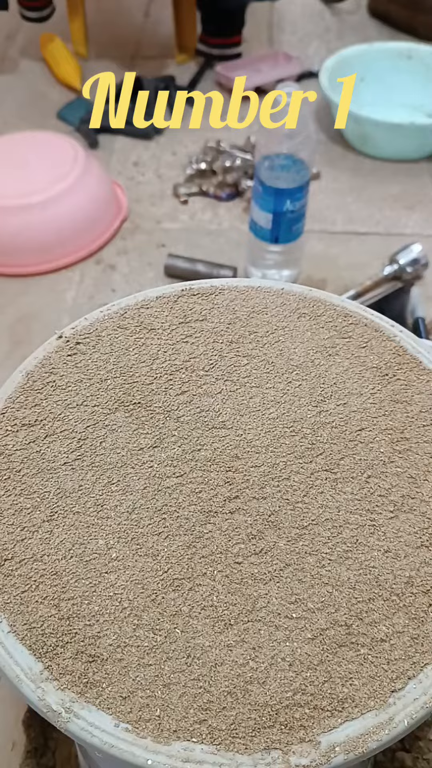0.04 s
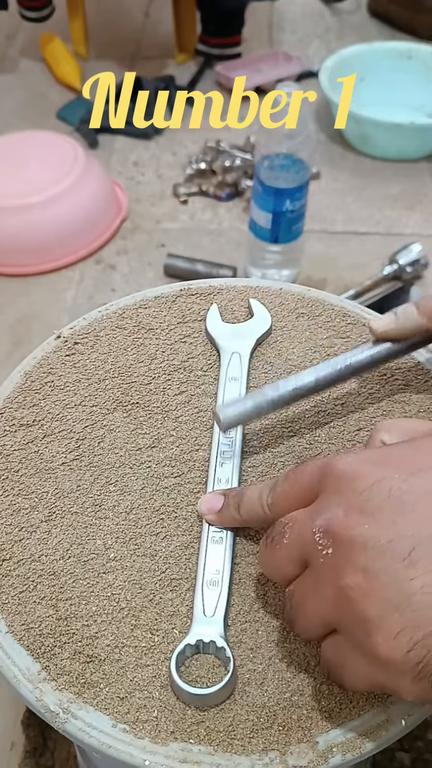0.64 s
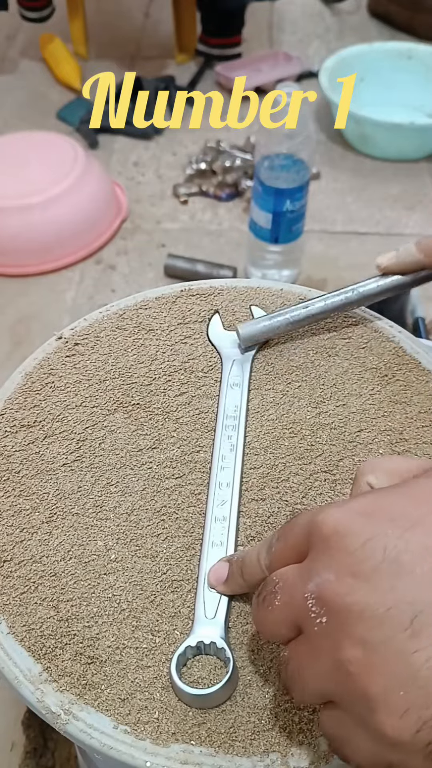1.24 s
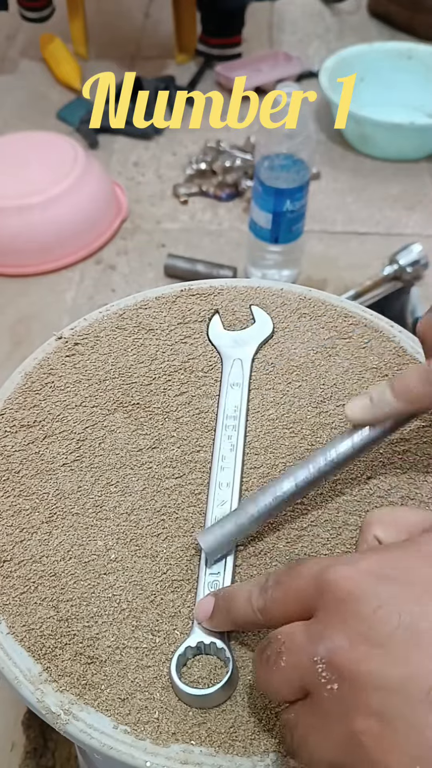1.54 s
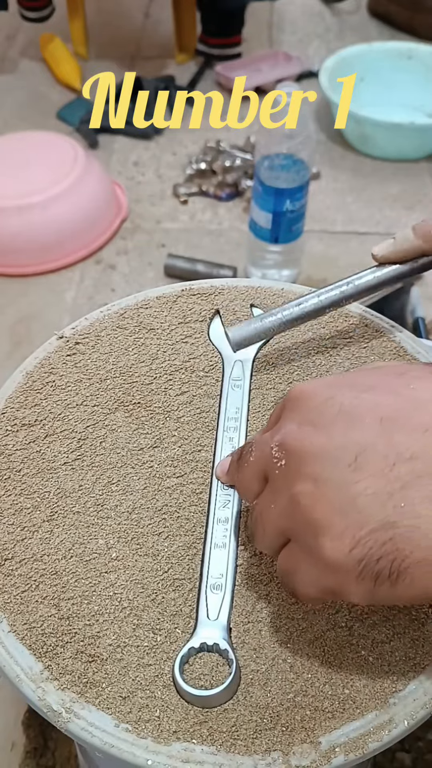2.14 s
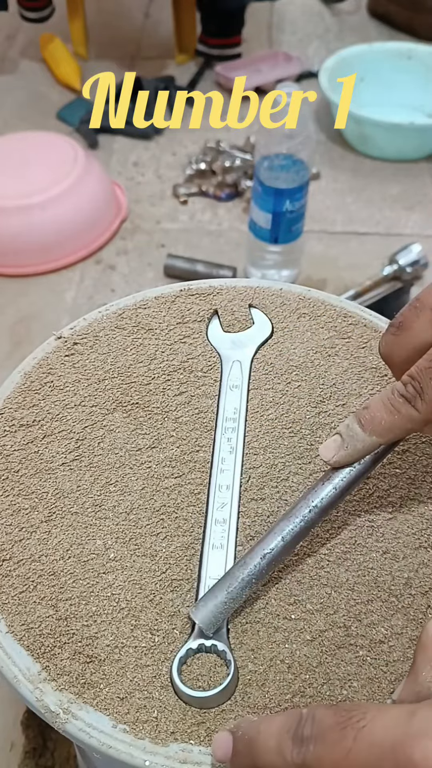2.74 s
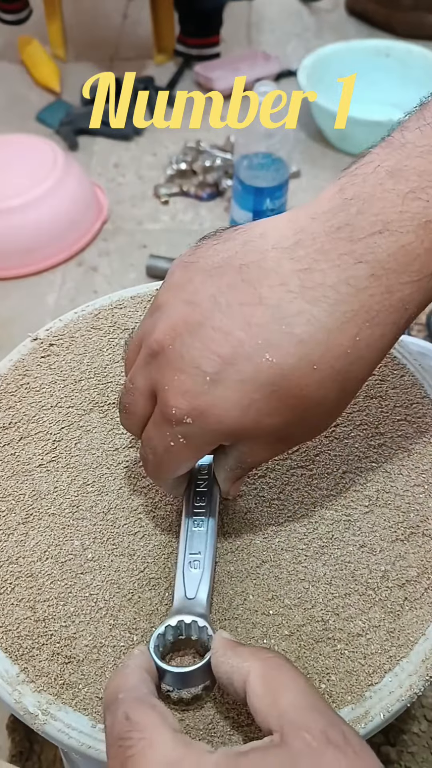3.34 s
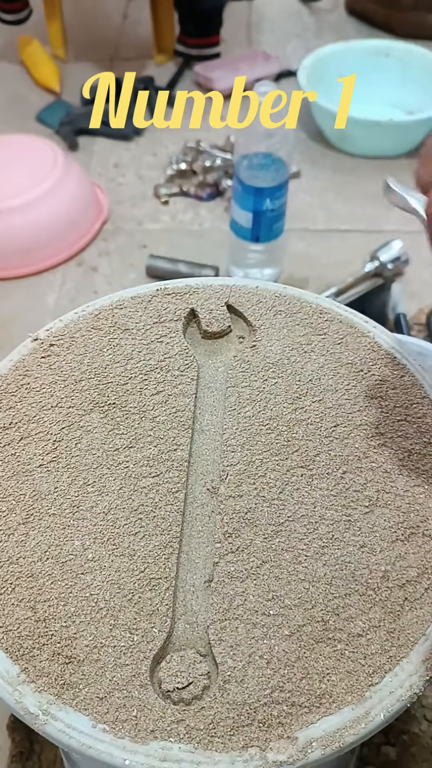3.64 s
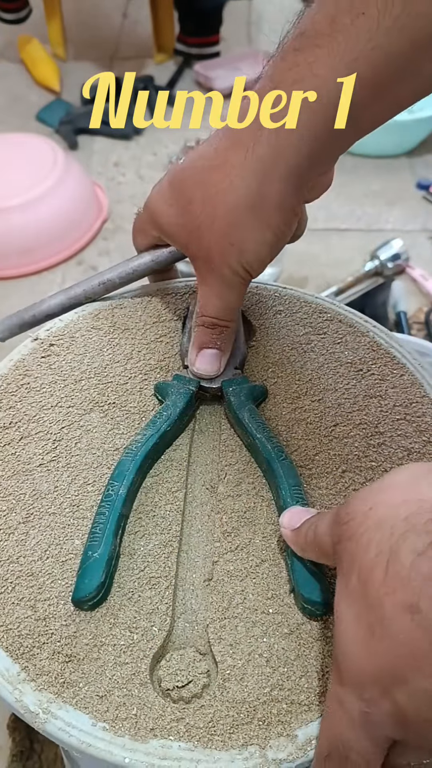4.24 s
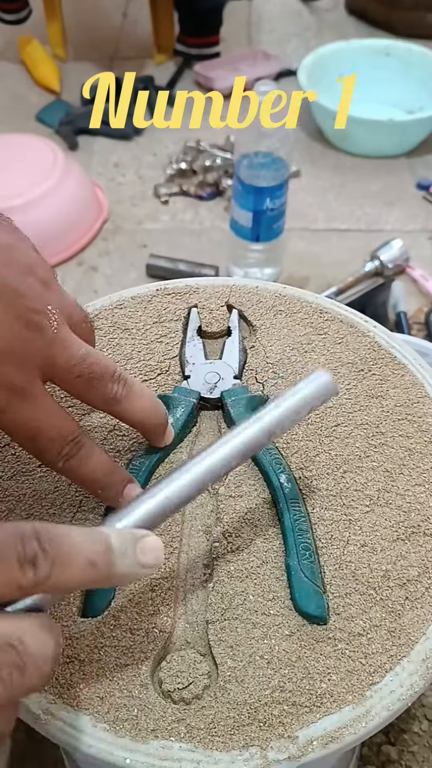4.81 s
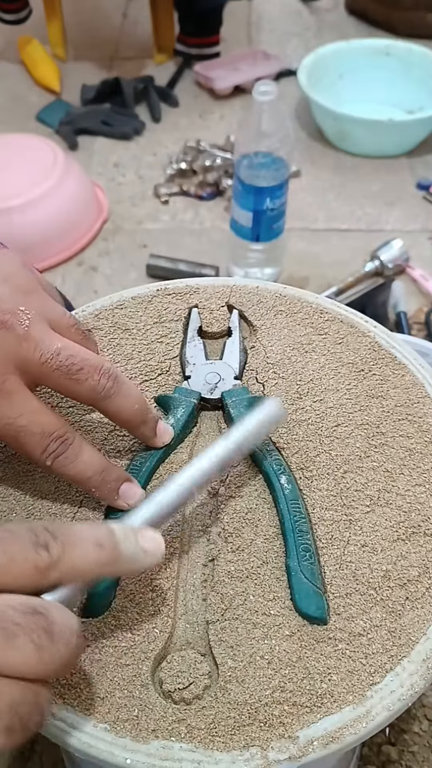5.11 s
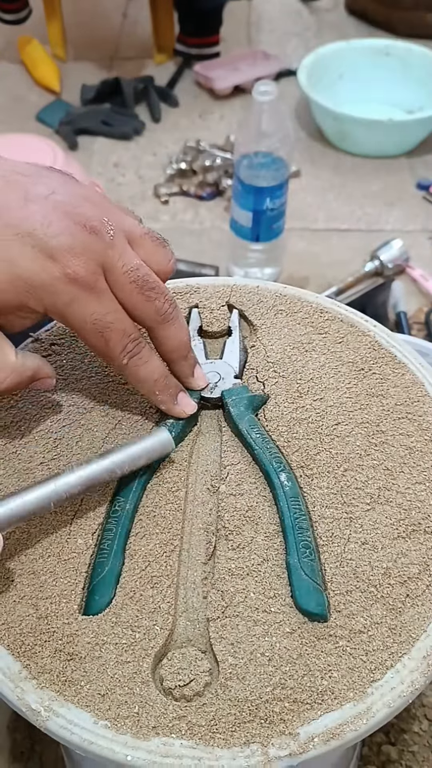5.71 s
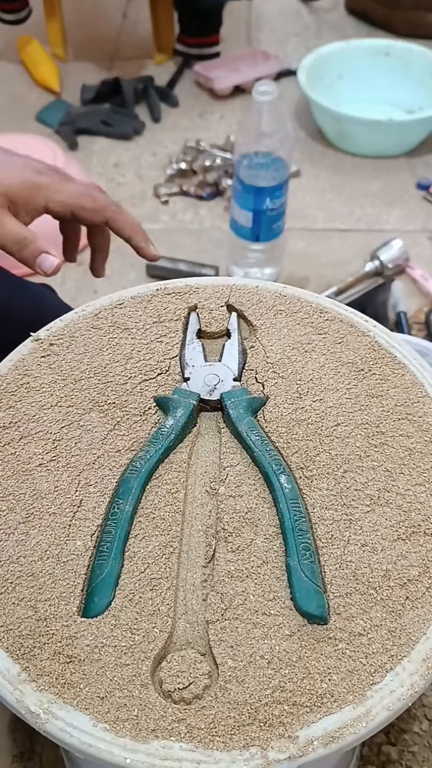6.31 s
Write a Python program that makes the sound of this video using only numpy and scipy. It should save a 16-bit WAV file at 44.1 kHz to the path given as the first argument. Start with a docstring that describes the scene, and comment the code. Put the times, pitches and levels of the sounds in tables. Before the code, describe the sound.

Quick metallic tapping on tools bedded in a tub of sand, then gritty scuffs, dull thuds, sharp clicks and a ringing clatter.

```python
"""A steel rod taps a spanner, then a pair of pliers, into a tub of casting sand, in runs of about
14 blows a second. Each blow clicks or just grazes, chatters on the gritty steel and thuds in the tub,
the more so as the tool beds in; the pliers' rubber grips give dull knocks. Sand rustles and the tub
rumbles under the hands. At the end the rod is put down on the floor and rings.
Stereo microphone close to the tub, in a quiet workshop."""
import sys
import numpy as np
from scipy import signal
from scipy.fft import rfft, irfft
from scipy.io import wavfile

SR = 44100
rng = np.random.default_rng(int(sys.argv[2]) if len(sys.argv) > 2 else 0)


def output_pcm(signal):
    """Save a mono or channel-first signal as 16-bit PCM at the path in sys.argv[1].

    Samples are clipped to [-1, 1] before scaling.
    """
    pcm = np.clip(np.atleast_2d(signal).T, -1, 1) * 32767
    wavfile.write(sys.argv[1], SR, np.round(pcm).astype(np.int16))


N = 289296
SIZE = 16384  # samples in one short sound
T, F = np.arange(SIZE) / SR, np.arange(SIZE // 2 + 1) * SR / SIZE
SCENE_T = np.arange(N) / SR
PULSE = 1. * (T == 0)[None]
SIDES = np.array([[1], [-1]])  # left, right


def amp(db):
    """Decibels to gain."""
    return 10 ** (np.asarray(db) / 20)


def curve(points, f=F):
    """Join (Hz, value) points on a log-frequency axis."""
    hz, value = np.transpose(points)
    return np.interp(np.log(f + 1), np.log(hz), value)


def colour(body, modes=()):
    """Gain of a body (Hz, dB) that falls away at its ends, with resonances (Hz, width Hz, dB) on top."""
    low_cut = 1 + (.7 * body[0][0] / (F + 1)) ** 4
    high_cut = 1 + (F / (1.5 * body[-1][0])) ** 6
    peaks = sum(amp(db) ** 2 / (1 + (2 * (F - hz) / width) ** 2) for hz, width, db in modes)
    return amp(curve(body)) * np.sqrt((1 + peaks) / (low_cut * high_cut))


def tilted(gain, db_per_octave):
    """Brighten or dull a spectrum."""
    return gain * amp(db_per_octave * np.log2((F + 100) / 1000))


def resonate(force, gain):
    """Ring a minimum-phase filter shaped like gain; white noise keeps its power."""
    cepstrum = irfft(np.log(gain / np.sqrt(np.mean(gain ** 2)) + 1e-5))
    cepstrum[..., 1:SIZE // 2] *= 2
    cepstrum[..., SIZE // 2 + 1:] = 0
    response = np.atleast_2d(irfft(np.exp(rfft(cepstrum))))
    return signal.fftconvolve(force, response, axes=1)[:, :SIZE]


def swell(rise, fall):
    """Envelope that peaks at 1 after rise seconds and dies with time constant fall."""
    rise = max(rise, .001)
    return (T / rise) ** (rise / fall) * np.exp((rise - T) / fall)


def burst(x):
    """Scale a short sound to the energy of 5 ms at unit power."""
    return x / np.sqrt(np.mean(np.sum(x ** 2, axis=1)) / (.005 * SR))


def add(out, s, x):
    """Mix x in at s seconds."""
    i = int(s * SR)
    out[:, i:i + SIZE] += x[:, :N - i]


def ports(noise, wide_hz=1350):
    """Noise at the microphone's two ports: alike in the bass, unrelated in the treble."""
    size = noise.shape[1]
    width = np.minimum(0.11 + np.arange(size // 2 + 1) * SR / size / wide_hz, 1)
    mid, side = rfft(noise[0]), width * rfft(noise[1])
    return irfft((mid + side * SIDES) / np.sqrt(1 + width ** 2), size)


# The ports differ in the treble. Each row: frequency in Hz, left minus right in dB.
PORT_BALANCE = [(1300, -2), (2500, -1.5), (4400, -3), (8000, -3.5), (10500, 3.5), (12500, 12), (16000, 1.5)]

def balance(pan_db=0):
    """Gain at each port for a source that is pan_db louder on the left."""
    return amp(SIDES * (curve(PORT_BALANCE) + pan_db) / 2)


def grit(spread_db=0):
    """Dense tiny impacts whose sizes vary by spread_db; at 0, plain noise."""
    noise = rng.standard_normal((2, SIZE))
    sizes = amp(spread_db * rng.standard_normal(SIZE // 16).repeat(16))
    grains = ports(noise * sizes)
    return grains / grains.std()


# The workshop's room tone. Each row: frequency in Hz, relative level in dB.
ROOM_TONE = [(25, -13), (40, -21), (60, 5), (95, -5), (150, -2.5), (190, 4.5), (240, -5.5), (310, -8),
             (450, -14.5), (800, -24), (1800, -28), (4000, -38), (9000, -51), (16000, -43.5)]
# A low hum in the room. Each row: time in seconds, level in dB.
HUM_LEVEL = [(0, -76.5), (2.95, -69.5), (3.1, -53.5), (3.2, -42.5), (3.35, -40.5), (3.5, -42.5),
             (3.7, -49.5), (3.9, -73), (6.56, -77)]

def workshop(air_db=-51, hum_hz=74.5):
    """Low rumble all round the microphone, and a hum that swells while the spanner is lifted."""
    f = np.arange(N // 2 + 1) * SR / N
    noise = ports(rng.standard_normal((2, N)))
    air = irfft(rfft(noise) * amp(curve(ROOM_TONE, f)), N)
    hum = np.sqrt(2) * np.sin(2 * np.pi * hum_hz * SCENE_T)
    hum_db = np.interp(SCENE_T, *np.transpose(HUM_LEVEL))
    return amp(air_db) * air / air.std() + amp(hum_db) * hum


def walls(x, t60=0.22, wet_db=-20):
    """The walls return a short, dull tail, faint this close to the tub."""
    dull = colour([(150, 6), (1000, 4.5), (4000, 1), (14000, -25.0)])
    tail = resonate(grit() * swell(.01, t60 / np.log(1000)), dull)
    tail /= np.sqrt(np.sum(tail ** 2) / 2)
    return amp(wet_db) * signal.fftconvolve(x, tail, axes=1)[:, :N]


# The full tub's resonances. Each row: frequency in Hz, width in Hz, height above the body in dB.
TUB_MODES = [(193, 22, 7.4), (301, 17, 8.5), (422.4, 24, 7.6), (643, 36, 4.3), (862, 12, 3),
             (1072, 23, 4.6)]

def tub_colour(body):
    """The tub rings at its modes and sways slowly below them."""
    sway = (61, 7, 11)
    return colour(body, TUB_MODES + [sway])


# Hands lean on the tub. Each row: time in seconds, level in dB.
LEANING_LEVEL = [(.3, -85), (.9, -43), (1.598, -54), (2.1, -40.5), (2.38, -53), (2.55, -48), (2.95, -51.5),
                 (3.6, -55), (4.3, -58), (4.55, -50.5), (5.35, -57), (5.65, -35.5), (5.9, -48.5),
                 (6.56, -55)]

def leaning():
    """Shifting weight on the sand makes the tub rumble."""
    db = np.interp(SCENE_T, *np.transpose(LEANING_LEVEL))
    push = amp(db) * ports(rng.standard_normal((2, N)))
    tub = tub_colour([(28, -7.5), (60, -1), (100, -7.5), (170, -1.5), (260, -9.5), (420, -20.5)])
    return signal.fftconvolve(push, resonate(PULSE, tub), axes=1)[:, :N]


# Pushes on the tub. Each row: start in seconds, level in dB, pitch in Hz.
TUB_BOOMS = [(.559, -34, 164.6), (4.754, -26, 177), (4.852, -28.5, 185)]

def booms(swell_s=0.0054, fall_s=0.028):
    """Pushed, the whole tub booms on one short, low note."""
    out = np.zeros((2, N))
    for s, db, hz in TUB_BOOMS:
        tone = np.sqrt(2) * np.sin(2 * np.pi * hz * T)[None]
        add(out, s, amp(db) * tone * swell(swell_s, fall_s))
    return out


def sand(hz, width_hz, peak_db):
    """Colour of brushed sand close to the microphone, with one band standing out."""
    body = [(500, 9), (2000, 5.0), (4500, -3), (9000, -8), (16000, -9.5)]
    return colour(body, [(hz, width_hz, peak_db)]) * balance()


# Sand moving under hands and tools. Each row: time in seconds, level in dB.
RUSTLE_LEVEL = [(0, -54.5), (.3, -72), (2.9, -65.5), (3.4, -72), (3.75, -67), (4.04, -52), (4.33, -66.5),
                (4.62, -58), (4.8, -40.5), (4.93, -54), (5.38, -71.5), (5.9, -62.5), (6.33, -59),
                (6.56, -59)]

def rustle(grain_db=3.0, flutter_db=3.04, flutter_s=0.041):
    """Sand grains shift in uneven little surges."""
    noise = rng.standard_normal((2, N))
    sizes = amp(grain_db * rng.standard_normal(N // 16 + 1).repeat(16)[:N])
    grains = ports(noise * sizes)
    surges = np.interp(SCENE_T / flutter_s, np.arange(1024), rng.standard_normal(1024))
    db = np.interp(SCENE_T, *np.transpose(RUSTLE_LEVEL)) + flutter_db * surges
    one_grain = resonate(PULSE, sand(hz=2900, width_hz=1800, peak_db=7))
    return signal.fftconvolve(amp(db) * grains / grains.std(), one_grain, axes=1)[:, :N]


# Scuffs in the sand. Each row: start in seconds, level in dB, swell in seconds, strong band in Hz.
SAND_SCUFFS = [(3.075, -50.5, 0.012, 900), (3.161, -53, 0.0048, 4040), (3.636, -55.5, 0.029, 4190),
               (3.8, -63, 0.028, 8700), (4.012, -43.5, 0.0093, 7350), (4.426, -51, 0.0098, 7500),
               (4.568, -56, 0.018, 2900), (4.705, -40, 0.0089, 4430), (4.756, -36, 0.011, 3530),
               (4.865, -43, 0.015, 1510), (5.18, -52, 0.027, 2300), (5.285, -56, .016, 3070)]

def scuffs(relative_width=0.31):
    """Brushed once, the sand gives a short, gritty hiss."""
    out = np.zeros((2, N))
    for s, db, rise, hz in SAND_SCUFFS:
        grains = grit(spread_db=2.8) * swell(rise, rise)
        add(out, s, amp(db) * resonate(grains, sand(hz, relative_width * hz, peak_db=9)))
    return out


# Tools touching. Each row: start in seconds, level in dB, pitch in Hz, time to fall 60 dB in seconds.
TOOL_CLINKS = [(.623, -26, 2690, 0.15), (.675, -19, 2750, .08), (.685, -28, 3920, 0.33),
               (.767, -22, 4000, .06), (2.584, -31.5, 2120, .035), (2.584, -28.5, 3630, 0.048),
               (3.166, -49, 1324, 0.19), (3.87, -52, 620, 0.41), (4.178, -39, 1258, 0.24),
               (4.253, -46.5, 1290, 0.2), (4.404, -57, 8900, .2), (5.816, -47.5, 2850, 0.28)]

def clinks(relative_width=0.062):
    """Steel clinks against steel and rings briefly in one narrow band."""
    out = np.zeros((2, N))
    for s, db, hz, t60 in TOOL_CLINKS:
        ring = 1 / (1 + ((F - hz) / (relative_width * hz)) ** 2)
        add(out, s, amp(db) * resonate(grit() * amp(-60 * T / t60), ring))
    return out


# The held rod's bending modes. Each row: frequency in Hz, width in Hz, height above the body in dB.
ROD_MODES = [(4002, 70, 11.5), (7615, 110, 17), (12168, 120, 20)]

def rod(ring_db):
    """The rod's modes stand out more or less, damped by what it touches."""
    return [(hz, width, db + ring_db) for hz, width, db in ROD_MODES]


# The rod is let go. Each row: start in seconds, level in dB, swell in seconds.
RING_STARTS = [(6.47, -34, 0.013), (6.514, -18.5, 0.013)]
# Its modes when free. Each row: relative level in dB, time to fall 60 dB in seconds,
# left minus right in dB.
FREE_MODES = [(0, 0.82, -6.5), (-7, 0.071, -15.5), (-17.5, 0.22, 7)]

def ringing_rod():
    """Out of the hand, the rod's bending modes ring as clear tones."""
    out = np.zeros((2, N))
    for s, db, rise in RING_STARTS:
        for (hz, _, _), (mode_db, t60, pan_db) in zip(ROD_MODES, FREE_MODES):
            tone = np.sqrt(2) * np.sin(2 * np.pi * (hz * T + rng.random()) + SIDES * np.pi / 5)
            gain = amp(db + mode_db + SIDES * pan_db / 2)
            add(out, s, gain * tone * swell(rise, t60 / np.log(1000)))
    return out


def spot(ripple_db, spacing_hz=170):
    """Each landing spot favours its own scatter of minor resonances."""
    levels = rng.standard_normal((2, 1024))
    ripple = np.array([np.interp(F / spacing_hz, np.arange(1024), side) for side in levels])
    return amp(ripple_db * ripple)


def hardness(db_per_octave, corner_hz=4000):
    """A soft contact loses treble above the corner; a hard one gains it."""
    return amp(db_per_octave * np.log2(1 + (F / corner_hz) ** 2) / 2)


def blows(rows, body, modes, thud, tick_db, click_s, click_tilt_db, fall_s, ripple_db,
          thump_db, thump_tilt_db, shudder_db, shudder_s, grit_db=5.0):
    """The rod lands with a click, then chatters; both shake what lies underneath."""
    out = np.zeros((2, N))
    metal, tub = colour(body, modes), tub_colour(thud)
    hard_tub = tilted(tub, thump_tilt_db)
    push = burst(resonate(PULSE, hard_tub))
    for s, click_db, chatter_db, rise, tub_db, treble_db, pan_db in rows:
        steel = metal * hardness(treble_db) * spot(ripple_db) * balance(pan_db)
        # first touch, then a few milliseconds of crushed grains
        contact = amp(tick_db) * burst(PULSE) + burst(grit() * np.exp(-T / click_s))
        click = burst(resonate(contact, tilted(steel, click_tilt_db)))
        # the tub feels the landing as one push and a short shudder, the chatter as a rumble
        shudder = burst(resonate(grit() * swell(0.0023, shudder_s), hard_tub))
        thump = push + amp(shudder_db) * shudder
        envelope = swell(rise, fall_s)
        rumble = resonate(grit() * envelope, tub)
        rumble *= np.sqrt(np.mean(envelope ** 2) / np.mean(rumble ** 2))
        chatter = resonate(grit(grit_db) * envelope, steel)
        add(out, s, amp(click_db) * (click + amp(tub_db + thump_db) * thump))
        add(out, s, amp(chatter_db) * (chatter + amp(tub_db) * rumble))
    return out


# The rod is put down. Each row: start in seconds, click in dB, chatter in dB, swell in seconds,
# thud relative to the steel in dB, treble slope in dB per octave.
SET_DOWN = [(6.469, -35, -23, 0.0054, 9.5, -22), (6.513, -39, -19.5, 0.012, 0.5, 7.5)]
# Contact noise and thud on the floor. Each row: frequency in Hz, relative level in dB.
FLOOR_BODY, FLOOR_THUD = [(500, 2), (1400, -4), (2200, 14), (3200, 8.5), (4800, -4.5), (6800, -4),
                          (9000, -24), (12000, -25), (16000, -42)], [(50, -20), (120, -9), (190, 4), (300, -2), (550, 1.5),
                                              (900, -2), (1500, 0.5), (2200, -33)]

def rod_on_floor():
    """The rod clatters onto the floor, one end and then the other."""
    rows = [(*row, 0) for row in SET_DOWN]  # no pan
    return blows(rows, FLOOR_BODY, rod(ring_db=1.5), FLOOR_THUD,
                 tick_db=-10, click_s=0.0036, click_tilt_db=-4.0, fall_s=0.019, ripple_db=0.0,
                 thump_db=2, thump_tilt_db=-3.5, shudder_db=7, shudder_s=0.0032)


# Square hits. Each row: start in seconds, click in dB, chatter in dB.
TAPS = [(.621, -15.5, -34), (.674, -10, -29), (0.7966, -9.5, -24), (0.853, -15.5, -25.5),
        (1.305, -6.5, -21.5), (1.491, -10.5, -31), (1.549, -17, -28), (1.671, -14, -23.5),
        (1.998, -10.5, -25), (2.162, -11, -26.5), (2.205, -16.5, -25), (2.627, -18.5, -51),
        (2.792, -12, -33.5), (2.839, -14.5, -39), (4.695, -11, -40.5), (4.932, -18.5, -48),
        (4.997, -17, -40), (5.060, -19.5, -36.5), (5.546, -33, -43), (5.724, -22.5, -43), (5.918, -24, -23),
        (6.063, -15.5, -22.5), (6.129, -12.5, -20)]
# Glancing blows, with no click. Each row: start in seconds, chatter in dB.
GRAZES = [(0.554, -33.5), (0.731, -25), (0.917, -22.5), (0.972, -24), (1.053, -24.5), (1.123, -22.5),
          (1.196, -22), (1.248, -23.5), (1.610, -24.5), (1.734, -24.5), (1.861, -30), (1.936, -28),
          (2.057, -21.5), (2.11, -24), (2.678, -32), (2.725, -28.5), (4.631, -37), (4.754, -41.5),
          (4.847, -61), (5.122, -36), (5.425, -60), (5.496, -52), (5.612, -51), (5.651, -43.5),
          (5.989, -21), (6.163, -25), (6.199, -20.5)]

def strokes(from_s, to_s, tap_swell_s, graze_swell_s, bedded_db, loose_db=0, bed_s=1):
    """Taps and grazes on one surface; a tool that still lies loose passes less of each to the tub."""
    rows = [(s, click_db, chatter_db, tap_swell_s) for s, click_db, chatter_db in TAPS]
    rows += [(s, -np.inf, db, graze_swell_s) for s, db in GRAZES]
    return [(s, click_db, chatter_db, rise, bedded_db + loose_db * np.exp((from_s - s) / bed_s))
            for s, click_db, chatter_db, rise in rows if from_s <= s < to_s]


# Contact noise and thud on the pliers' jaws. Each row: frequency in Hz, relative level in dB.
JAW_BODY, JAW_THUD = [(400, -20.5), (1000, -6.5), (2000, -1.5), (3400, 1), (4500, -9.5), (5500, -4.5),
                      (7000, -18), (8500, -16), (10800, -24.5), (14500, -20.5), (16000, -34)], [(60, -10.5), (130, -13.5), (190, -3), (300, -2.5), (500, -6.5),
                                        (800, -11.5), (1500, -25)]

def rod_on_jaws(treble_db=0.2, pan_db=0.7):
    """The pliers' bare steel jaws bring out the rod's ring."""
    hits = strokes(from_s=5.9, to_s=6.3, tap_swell_s=0.014, graze_swell_s=0.015, bedded_db=-4.0)
    rows = [(*hit, treble_db, pan_db) for hit in hits]
    return blows(rows, JAW_BODY, rod(ring_db=3.5), JAW_THUD,
                 tick_db=-8.5, click_s=0.0018, click_tilt_db=1.0, fall_s=0.015, ripple_db=4.5,
                 thump_db=-9.5, thump_tilt_db=3, shudder_db=-2.0, shudder_s=0.00435)


# Contact noise and thud on the pliers' grips. Each row: frequency in Hz, relative level in dB.
GRIP_BODY, GRIP_THUD = [(500, 1), (1200, 0), (1900, 2), (2900, -1), (4000, -5.5), (4700, -12),
                        (7500, -22.5), (10000, -28), (12200, -32), (16000, -21.5)], [(50, -30), (120, -6), (185, 2.5), (300, 4), (560, -6), (800, -9),
                                           (1300, -16.5), (2200, -41)]

def rod_on_grips(treble_db=-1.0, pan_db=1.7):
    """The rubber grips give dull knocks: the microphone hears mostly the tub."""
    hits = strokes(from_s=4.6, to_s=5.8, tap_swell_s=0.0041, graze_swell_s=.014,
                   bedded_db=26, loose_db=-13, bed_s=1.0)
    rows = [(*hit, treble_db, pan_db) for hit in hits]
    return blows(rows, GRIP_BODY, rod(ring_db=-1.5), GRIP_THUD,
                 tick_db=-8.5, click_s=0.0028, click_tilt_db=-3.5, fall_s=0.017, ripple_db=1.5,
                 thump_db=-11.0, thump_tilt_db=3.5, shudder_db=-2, shudder_s=0.0062)


# The spanner's resonances. Each row: frequency in Hz, width in Hz, height above the body in dB.
SPANNER_MODES = [(1250, 90, 8), (2470, 160, 9), (3080, 130, 4), (6530, 240, 10), (8950, 200, 4),
                 (12900, 200, 11), (15220, 170, 14)]
# Contact noise and thud on the spanner. Each row: frequency in Hz, relative level in dB.
SPANNER_BODY, SPANNER_THUD = [(400, -13), (900, 0), (1800, -1), (2900, 4), (4000, 0.5), (5000, 1),
                              (7000, -4.5), (9000, -7.5), (11000, -13), (14000, -11.5), (16000, -19.5)], [(60, -12.5), (140, -6.5), (200, 1), (320, 5.5),
                                                    (520, -1.5), (800, -5.5), (1500, -17.5)]
# Where the rod lands. Each row: time in seconds, distance from the open jaw in cm.
LANDING_SPOTS = [(.55, 10), (.62, 1), (.8, 8.5), (.93, 10), (1.08, 2.5), (1.3, 4.5), (1.49, 9), (1.67, 7),
                 (1.74, 14.5), (1.94, 5), (2.16, 2), (2.25, 12), (2.74, 8.5), (2.84, 23.5)]

def rod_on_spanner(jaw_treble_db=5.5, treble_db_per_cm=-0.91, jaw_pan_db=0.56, pan_db_per_cm=-0.04):
    """Steel on steel, close up: brightest at the jaw, duller and a little further right at the ring."""
    hits = strokes(from_s=.55, to_s=3, tap_swell_s=0.022, graze_swell_s=0.02,
                   bedded_db=-6.0, loose_db=-15, bed_s=0.19)
    spots_cm = np.interp([hit[0] for hit in hits], *np.transpose(LANDING_SPOTS))
    rows = [(*hit, jaw_treble_db + treble_db_per_cm * cm, jaw_pan_db + pan_db_per_cm * cm)
            for hit, cm in zip(hits, spots_cm)]
    return blows(rows, SPANNER_BODY, rod(ring_db=-3.0) + SPANNER_MODES, SPANNER_THUD,
                 tick_db=-9.5, click_s=0.0026, click_tilt_db=2.0, fall_s=0.013, ripple_db=2.5,
                 thump_db=-9.0, thump_tilt_db=5.0, shudder_db=1.0, shudder_s=0.0015, grit_db=2.5)


def scene():
    """Spanner, grips, jaws, then the rod on the floor, with the workshop behind."""
    strikes = rod_on_spanner() + rod_on_grips() + rod_on_jaws() + rod_on_floor()
    close = strikes + ringing_rod() + booms() + clinks() + scuffs() + rustle() + leaning()
    return close + walls(close) + workshop()


def record(dry, top_hz=16500):
    """The hardest clicks overload the recorder; the top is cut."""
    low_pass = signal.ellip(10, .2, 75, top_hz, fs=SR, output="sos")
    return signal.sosfilt(low_pass, np.clip(dry, -1, 1))


dry = scene()
out = record(dry)
output_pcm(out)
```